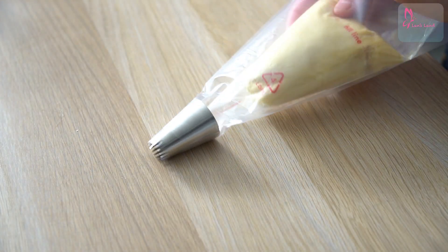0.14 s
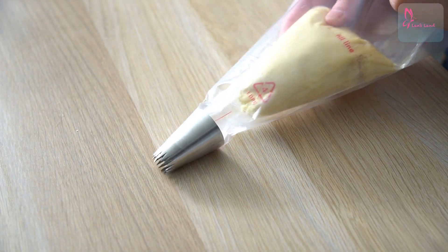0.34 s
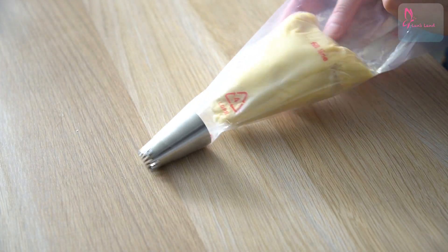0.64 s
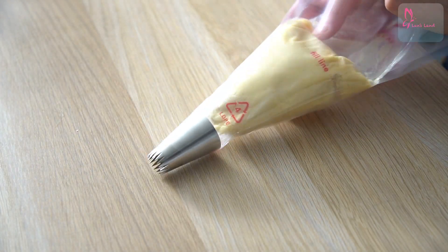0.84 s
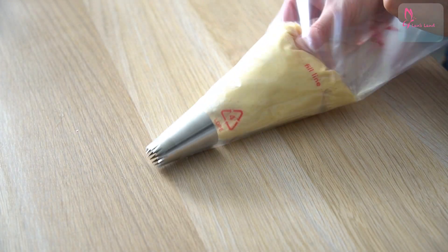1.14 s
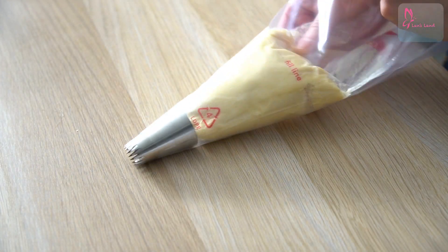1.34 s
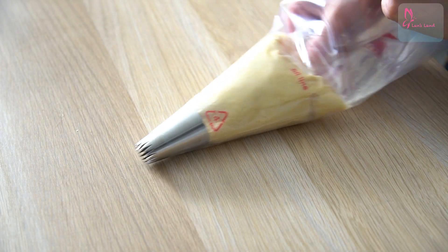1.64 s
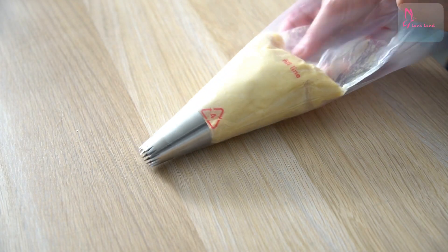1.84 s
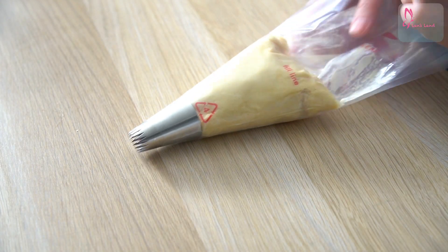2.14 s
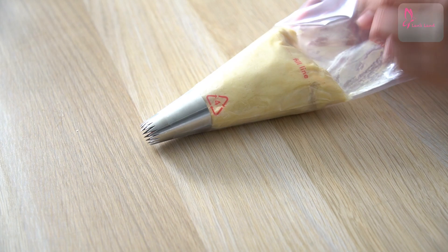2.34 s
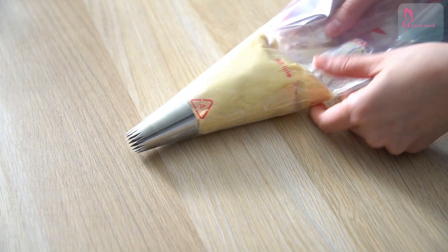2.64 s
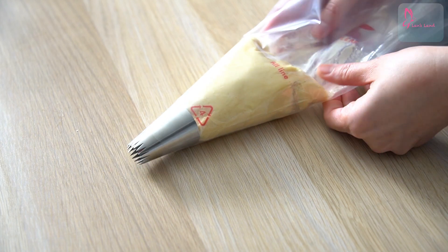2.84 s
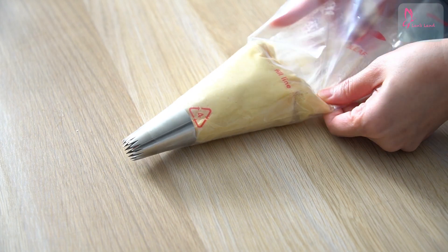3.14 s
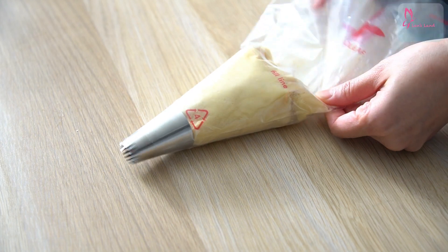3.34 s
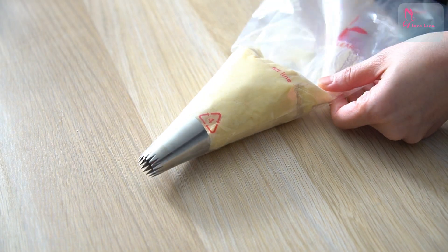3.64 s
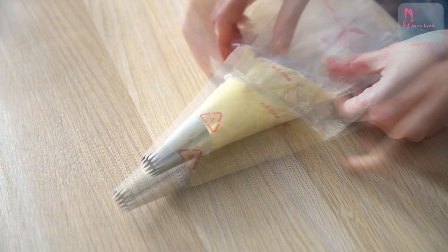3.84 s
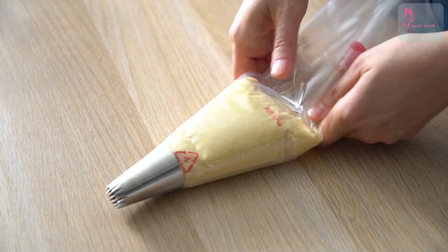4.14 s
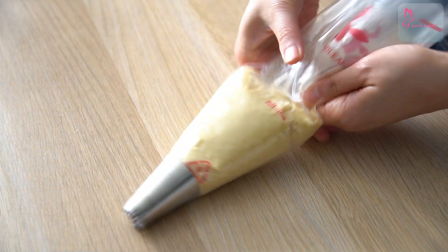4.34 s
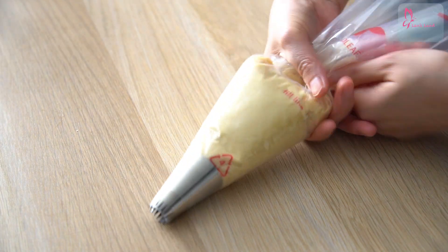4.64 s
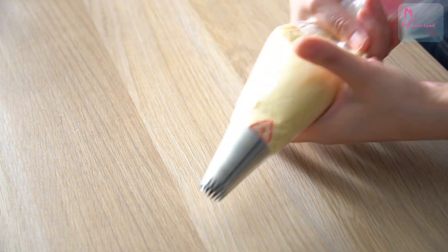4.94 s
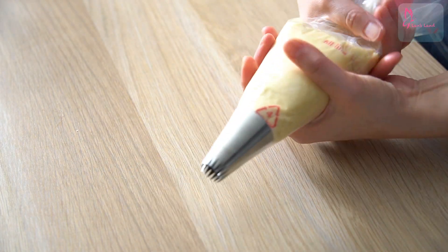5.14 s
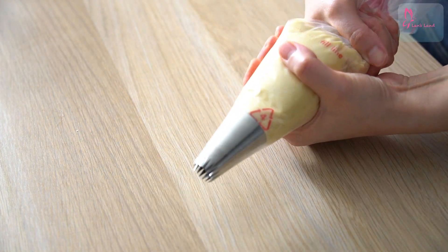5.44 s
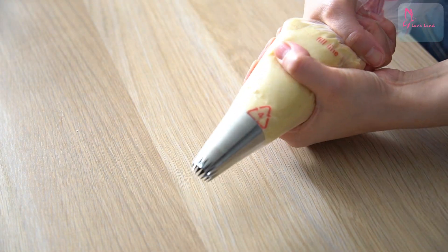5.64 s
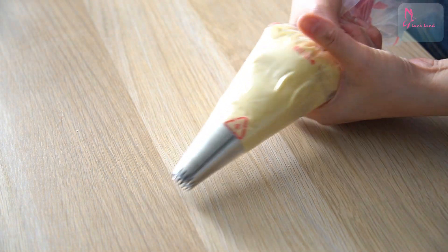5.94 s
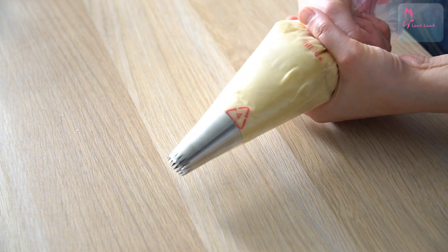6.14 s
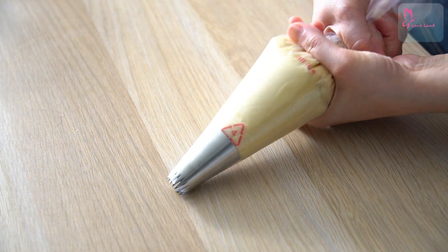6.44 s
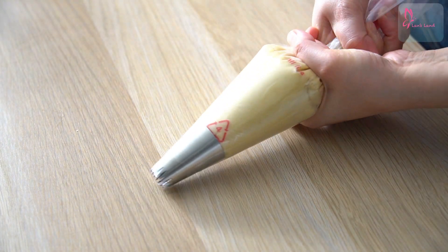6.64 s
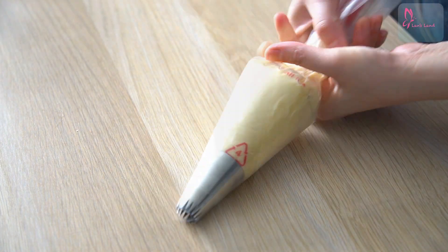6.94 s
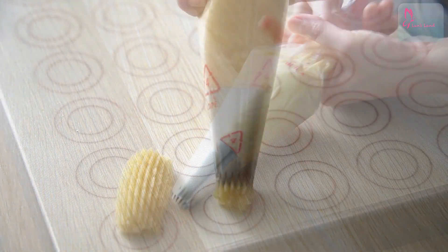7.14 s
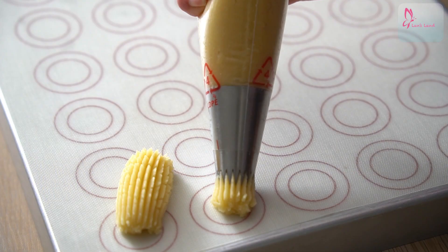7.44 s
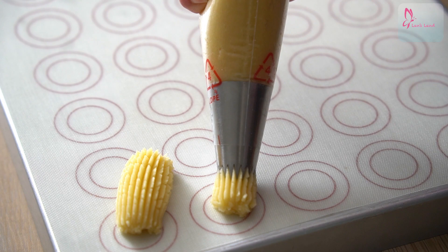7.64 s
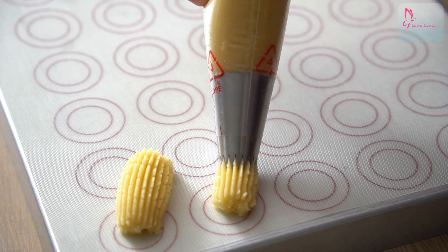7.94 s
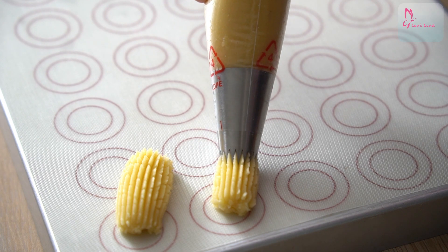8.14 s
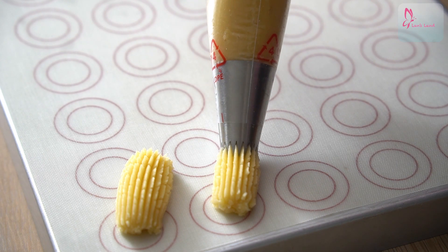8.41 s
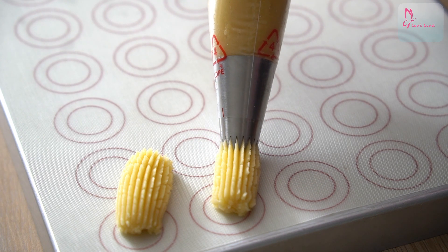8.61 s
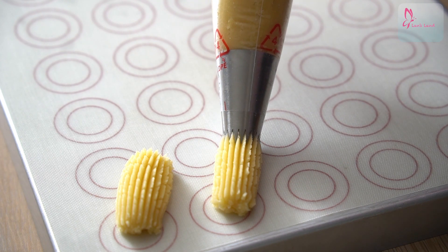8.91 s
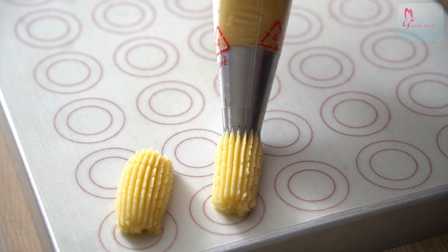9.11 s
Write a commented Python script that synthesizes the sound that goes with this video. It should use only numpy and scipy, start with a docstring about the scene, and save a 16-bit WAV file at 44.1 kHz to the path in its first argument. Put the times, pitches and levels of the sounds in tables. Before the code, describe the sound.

Hands squeeze a thin plastic piping bag on a wooden kitchen table, crinkling and snapping sharply, then a sudden cut to near silence with faint ticks.

```python
"""First, hands squeeze a thin plastic piping bag on a wooden table in a hard-walled kitchen, close to stereo
microphones: flipping creases ring and crack over fine crackle, the nozzle excites wood and steel modes, and
echoes with a dense tail answer. Shaped noise (room air) and wavering sines (appliance hum) lie beneath.
At 7.4 s a fade of under 3 ms leads to a quieter scene: softer air, the hum and three faint film ticks."""
import sys
import numpy as np
from scipy import signal
from scipy.io import wavfile
from scipy.ndimage import uniform_filter1d

SR = 44100
rng = np.random.default_rng(int(sys.argv[2]) if len(sys.argv) > 2 else 0)


def int16_out(signal):
    """Quantize to a 16-bit WAV file."""
    q = np.round(np.clip(np.atleast_2d(signal).T, -1, 1) * 32767)
    wavfile.write(sys.argv[1], SR, q.astype(np.int16))


N = 408807
EDIT_S = 7.405  # start of the quieter scene


def amp(db):
    """Decibels to gain."""
    return 10 ** (np.asarray(db) / 20)


def evened(x):
    """Scales to rms 1."""
    return x / np.sqrt(np.mean(x ** 2) + 1e-20)


def read(points, hz):
    """Interpolates a table on a log-frequency axis."""
    point_hz, value = np.transpose(points)
    return np.interp(np.log(hz + 1), np.log(point_hz + 1), value)


def add(mix, start_s, sound):
    """Adds a sound to both channels at a time."""
    part = mix[:, max(round(start_s * SR), 0):][:, :sound.shape[-1]]
    part += sound[..., :part.shape[-1]]


def panned(left_db):
    """Channel gains that set left over right by left_db."""
    return amp([[left_db / 2], [-left_db / 2]])


def slow(top_hz):
    """Random drift of rms 1: 20 sines over the three octaves below top_hz."""
    t = np.arange(0, N + 256, 256) / SR
    rates_hz = np.geomspace(top_hz / 8, top_hz, 20)
    drift = sum(np.sin(2 * np.pi * (hz * t + rng.random())) for hz in rates_hz)
    return np.interp(np.arange(N) / SR, t, evened(drift))


# spectrum of room air and microphone hiss: (freq_hz, density_db)
AIR_COLOUR = [(130, -23.5), (300, -13), (450, -12), (640, -12), (1000, -14), (2800, -20), (3600, -27.5),
              (10000, -31.5), (15700, -35.5)]
# tilt of the air in the first scene: (freq_hz, gain_db)
FIRST_AIR_TILT = [(200, 0.5), (600, -2), (2500, 4.5), (6000, 6), (14000, 5.5)]
# left-right likeness of the air, first scene: (freq_hz, likeness_ratio)
FIRST_AIR_LIKENESS = [(60, 0.98), (380, 0.98), (2380, 0.14), (15000, 0.4)]
# left-right likeness of the air, second scene: (freq_hz, likeness_ratio)
SECOND_AIR_LIKENESS = [(60, 0.35), (240, 0.28), (950, 0.072), (3770, 0.03), (15000, 0.07)]
FIRST_AIR_DB, SECOND_AIR_DB = -47.5, -55.5


def air():
    """Random short-time spectra with soft patches; the first scene louder and tilted, the second throbbing."""
    frames, hz = N // 256 + 5, np.fft.rfftfreq(1024, 1 / SR)
    a, b, c, d, patches = rng.standard_normal((frames, 513, 5)).T
    left, other = a + 1j * b, c + 1j * d
    soft = uniform_filter1d(uniform_filter1d(patches, 12, 0), 14, 1)
    colour_db = read(AIR_COLOUR, hz)[:, None] + 1.54 * evened(soft)
    first_tilt_db = read(FIRST_AIR_TILT, hz)[:, None]
    airs = []
    for likeness, tilt_db in ((FIRST_AIR_LIKENESS, first_tilt_db), (SECOND_AIR_LIKENESS, 0)):
        same = np.clip(read(likeness, hz), -1, 1)[:, None]
        right = same * left + np.sqrt(1 - same ** 2) * other
        spectra = np.array([left, right]) * amp(colour_db + tilt_db)
        airs.append(evened(signal.istft(spectra, nperseg=1024, noverlap=768)[1][:, :N]))
    return amp(FIRST_AIR_DB) * airs[0], amp(SECOND_AIR_DB + 1.0 * slow(22)) * airs[1]


# appliance lines: (freq_hz, level_db)
HUM_LINES = [(442, -69.5), (543, -62.5), (1708, -75.5)]


def hum():
    """Two motor lines and a faint whine: sines wavering in level and phase."""
    t, out = np.arange(N) / SR, 0
    for hz, level_db in HUM_LINES:
        level = np.sqrt(2) * amp(level_db + 1.8 * slow(6.7))
        out = out + level * np.sin(2 * np.pi * (hz * t + 0.15 * slow(6.6)))
    return out


# decay of the room tail: (freq_hz, t60_s)
ROOM_DECAY = [(300, 0.32), (800, 0.38), (2500, 0.42), (6000, 0.28), (14000, 0.25)]
# strength of the tail: (freq_hz, gain_db)
ROOM_LEVEL = [(700, -5.5), (2500, -6.5), (9000, -2)]
# left-right likeness of the tail: (freq_hz, likeness_ratio)
ROOM_LIKENESS = [(300, 1), (1000, 0.92), (3000, 0.6), (9000, 0.44)]
# single echoes: (delay_s, left_db, right_db)
ECHOES = [(.006, -15.5, -10.5), (0.0155, -17, -18)]


def kitchen(x):
    """Single echoes and a dense tail of sparse taps in which each band dies at its own speed."""
    taps = np.zeros((2, 20000))
    at = np.arange(440, 19980, 20) + rng.integers(0, 20, (2, 977))
    np.put_along_axis(taps, at, rng.choice([-1., 1.], at.shape), 1)
    hz, t, (a, b) = signal.stft(taps, SR, nperseg=256)
    same = np.clip(read(ROOM_LIKENESS, hz), 0, 1)[:, None]
    right = same * a + np.sqrt(1 - same ** 2) * b
    decaying = np.array([a, right]) * amp(-60 * t / read(ROOM_DECAY, hz)[:, None])
    coloured = decaying * amp(read(ROOM_LEVEL, hz))[:, None]
    even, tail = (signal.istft(part, SR, nperseg=256)[1] for part in (decaying, coloured))
    tail /= np.linalg.norm(even[0])  # scaled by the uncoloured tail
    for delay_s, *level_db in ECHOES:
        tail[:, round(delay_s * SR)] += amp(level_db)
    return signal.fftconvolve(x.mean(0)[None], tail, axes=1)[:, :N]


def flick(hz, cycles, phase, apart):
    """A film patch flips: a few cycles swell and die, reaching the two channels 2 * apart samples apart."""
    turns = np.maximum(np.arange(-8, 440) - apart * np.array([[1], [-1]]), 0) * hz / SR
    burst = turns * np.exp(-turns / cycles) * np.sin(2 * np.pi * (turns + phase))
    burst = np.diff(burst, prepend=0)  # a small sheet radiates no bass
    return burst / abs(burst).max()


# faint ticks of the stretched bag: (start_s, level_db)
TICKS = [(7.5331, -57), (7.6633, -56), (8.6989, -59)]


def ticks():
    """The stretched bag ticks faintly: a flick convolved with a short airy noise tail."""
    out, t = np.zeros((2, N)), np.arange(3000) / SR
    for start_s, level_db in TICKS:
        tail = rng.standard_normal((2, 3000)) * amp(-10.0 - 60 * t / 0.28)
        add(out, start_s, amp(level_db) * signal.fftconvolve(flick(9600, 0.5, 0, 1), tail, axes=1))
    return out


# nozzle and bag on the table: (start_s, level_db, steel_db, lowest_wood_db, middle_steel_db)
KNOCKS = [(.533, -23.5, -11, -0.5, -9), (.546, -32, -1.5, -11, -8), (.832, -26, -18, 1.5, -2),
          (.976, -18.5, -11.5, 0, -1), (.983, -29.5, -7, -2, 3), (2.596, -34, -45, -2.5, 4),
          (4.443, -24.5, -12.5, 1, -3), (7.107, -18, -50, -6.5, -3)]
# table top modes: (freq_hz, level_db, t60_s)
WOOD_MODES = [(670, 1.5, 0.049), (752.5, 8.5, 0.023), (881, -1, 0.032), (1148, -9.5, 0.043),
              (1590, -4, 0.017)]
# nozzle modes: (freq_hz, level_db, t60_s)
STEEL_MODES = [(1760, 3, 0.09), (1930, 3, 0.07), (2700, -1, 0.03), (4500, -5, 0.06), (5500, -4, 0.06),
               (7160, -2, 0.09), (9170, -4, 0.06), (12850, -4, 0.065)]


def ringing(modes, t):
    """Decaying sines, one per mode."""
    return [amp(db - 60 * t / t60_s) * np.sin(2 * np.pi * hz * t) for hz, db, t60_s in modes]


def knocks():
    """Each blow rings wood and steel modes, weighted by where it lands; the steel chatters briefly."""
    out, t = np.zeros((2, N)), np.arange(SR // 4) / SR
    wood, steel = ringing(WOOD_MODES, t), ringing(STEEL_MODES, t)
    middle = np.array([2500 < hz < 10000 for hz, *_ in STEEL_MODES])
    give = 1 - np.exp(-(t / 0.0026) ** 2)  # the wood takes a moment to give way
    for start_s, level_db, steel_db, lowest_wood_db, middle_steel_db in KNOCKS:
        chatter = rng.standard_normal(1500) * amp(-21.5 - 60 * t[:1500] / 0.069)
        chatter[0] = 1  # the blow itself
        table = give * (amp(lowest_wood_db) * wood[0] + sum(wood[1:]))
        spot_db = 2 * rng.standard_normal(len(STEEL_MODES))
        modes = amp(spot_db + middle_steel_db * middle) @ steel
        cone = signal.fftconvolve(modes, chatter) + amp(-1.0) * np.pad(chatter, (0, len(t) - 1))
        blow = table + amp(steel_db) * cone[:len(t)]
        add(out, start_s, amp(level_db) * panned(1.5) * blow)
    return out


# squeezes of the hands: (start_s, length_s, crackle_db, treble_db)
SQUEEZES = [(0.0, .1, -45.5, -9.5), (0.105, 0.086, -38.5, -17), (0.362, 0.34, -45, -5),
            (0.817, 0.37, -38.5, -5), (1.328, 0.58, -36.5, -9), (1.758, 0.14, -34, -19),
            (2.024, 0.23, -39, -4.5), (2.3, 0.023, -37, -25), (2.577, 0.23, -51.5, -11),
            (2.935, 0.027, -36.5, -7.5), (3.136, 0.29, -34, -6.5), (3.531, 0.044, -37.5, -3),
            (3.866, 0.21, -32, -10), (4.175, 0.18, -35.5, -4.5), (4.408, 0.35, -37, -3.5),
            (4.92, 0.14, -40, -4), (5.319, 0.27, -41.5, -4), (6.355, 0.19, -51, 2.5),
            (6.567, 0.055, -39, -17), (6.734, 0.12, -43, -0.5), (6.954, 0.091, -42, -5.5),
            (7.242, 0.19, -46, -4.5)]
GRIP_DB_PER_S, SAG_DB_PER_S, LET_GO_DB_PER_S, REST_DB = 287, 4, 186, -65.5


def effort():
    """Each squeeze grips fast, sags while held and lets go; the strongest sets crackle level and treble."""
    start_s, length_s, peak_db, treble_db = np.transpose(SQUEEZES)[:, :, None]
    since_s = np.arange(0, N + 256, 256) / SR - start_s
    held_db = peak_db + np.minimum(since_s * GRIP_DB_PER_S, -since_s * SAG_DB_PER_S)
    shape_db = held_db - LET_GO_DB_PER_S * np.maximum(since_s - length_s, 0)
    level_db = np.maximum(shape_db.max(0), REST_DB)
    treble_db = uniform_filter1d(treble_db[shape_db.argmax(0), 0], size=7)
    return [np.interp(np.arange(N) / 256, np.arange(len(c)), c) for c in (level_db, treble_db)]


# colour of the crackle: (freq_hz, gain_db)
FILM_COLOUR = [(150, -46), (309, -5), (981, -2), (1910, 2.5), (2860, -1), (6870, -6.5), (9750, -12),
               (15100, -47)]


def crackle():
    """Thousands of small creases of all sizes, in clumps, coloured by the film."""
    level_db, treble_db = effort()
    t = np.arange(N) / SR
    at = np.flatnonzero(rng.random(N) < 480 / SR * amp(6.0 * slow(35)))  # clumped onsets
    sizes = amp(2.85 * np.minimum(rng.exponential(1, N), 4)) * rng.choice([-1, 1], N)
    patch = rng.integers(0, 40, N)
    low, high = np.zeros((2, 2, N))
    for k, hz in enumerate(np.geomspace(400, 12000, num=40)):
        rattle = rng.standard_normal((1, 150)) * amp(-23.5 - 60 * t[:150] / 0.037)
        rattle[:, 0] = 1
        flip = flick(hz, rng.uniform(0.14, 1.1), rng.random(), rng.normal(0, 0.55))
        grain = signal.fftconvolve(flip, rattle)
        grain *= np.sqrt(hz) * amp(read(FILM_COLOUR, hz)) * panned(rng.normal(0, 5.8)) / np.linalg.norm(grain)
        for start in at[patch[at] == k]:
            add(high if hz > 6500 else low, start / SR, sizes[start] * grain)
    level = amp(level_db) * (t < EDIT_S)
    return level * (evened(low[:, :N]) + amp(treble_db) * evened(high[:, :N]))


LESSER_COUNT, LESSER_OVER_DB, LESSER_SPREAD_DB = 190, 10, -0.5
LESSER_HZ, LESSER_OCTAVES, LESSER_TREBLE_DB = 3110, 0.65, -16.5


def lesser_snaps():
    """Lesser creases flip at random times, as strong as the squeeze of the moment; rows as in SNAPS."""
    start_s = rng.uniform(0, EDIT_S, LESSER_COUNT)
    size, pitch, sheen = rng.standard_normal((3, LESSER_COUNT))
    squeeze_db = effort()[0][(start_s * SR).astype(int)]
    level_db = squeeze_db + LESSER_OVER_DB + LESSER_SPREAD_DB * size
    pitch_hz = np.clip(LESSER_HZ * 2 ** (LESSER_OCTAVES * pitch), 900, 9500)
    return list(zip(start_s, level_db, pitch_hz, level_db + LESSER_TREBLE_DB + 5.2 * sheen))


# single creases that flip: (start_s, level_db, pitch_hz, treble_db)
SNAPS = [(0.1159, -20.5, 2850, -38), (0.1535, -15.5, 3230, -27), (0.1685, -12, 3040, -22),
         (0.4363, -18, 2460, -24.5), (0.5247, -13, 2920, -26.5), (0.5303, -19, 1860, -28.5),
         (0.612, -14.5, 3530, -27.5), (0.6847, -20.5, 2040, -36.5), (0.7236, -19, 4900, -39),
         (0.8251, -18.5, 1850, -33.5), (0.8325, -19.5, 2510, -26), (0.9514, -24, 2620, -42),
         (0.9668, -16, 1920, -31), (0.9752, -14, 930, -20.5), (1.0752, -22, 1600, -32),
         (1.0912, -19, 3200, -39), (1.1132, -24, 1460, -37), (1.3319, -21, 1470, -52),
         (1.3822, -25, 1760, -37), (1.4297, -18.5, 1480, -22.5), (1.4982, -18, 1510, -33),
         (1.6544, -12, 4690, -31), (1.6911, -10.5, 3820, -21.5), (1.738, -15, 5470, -31),
         (1.7685, -20.5, 2610, -46), (1.8139, -8.5, 2730, -27), (1.8484, -14, 2470, -37),
         (1.855, -11.5, 1460, -28.5), (1.925, -17, 1550, -32), (2.0767, -8.5, 2960, -23.5),
         (2.203, -18, 3200, -34), (2.3083, -6.5, 4960, -32), (2.3326, -18.5, 1770, -27.5),
         (2.4498, -20.5, 1720, -37.5), (2.6302, -26, 1180, -56), (2.7303, -21, 1070, -22.5),
         (2.9253, -19, 2650, -46), (2.9803, -17, 3400, -44), (3.1331, -14.5, 3030, -22),
         (3.2076, -23, 3260, -38), (3.2776, -17, 2000, -26.5), (3.3481, -15.5, 1990, -31),
         (3.366, -16.5, 2300, -27.5), (3.3902, -13, 2920, -28.5), (3.4007, -18, 1960, -25.5),
         (3.5316, -18, 4200, -27), (3.8276, -15.5, 3340, -36), (3.8596, -19, 2870, -46),
         (3.888, -14.5, 2510, -32), (3.9062, -10, 2800, -27), (3.9315, -20, 2450, -31),
         (3.9987, -17, 3200, -27), (4.0115, -15, 5030, -19.5), (4.043, -12.5, 3030, -29),
         (4.0662, -19.5, 3100, -27.5), (4.1395, -18.5, 8490, -32), (4.1464, -23, 2240, -30),
         (4.1716, -26.5, 969, -28.5), (4.225, -25, 2180, -39), (4.2528, -13.5, 3550, -31),
         (4.357, -16, 3230, -30), (4.4013, -19, 2390, -26), (4.435, -9, 1920, -15.5),
         (4.5287, -14.5, 2700, -27), (4.6032, -20.5, 2910, -37), (4.6604, -18, 3120, -45),
         (4.6725, -13.5, 4720, -33), (4.6962, -12, 3200, -24), (4.7381, -16, 6100, -28),
         (4.7755, -22.5, 2450, -44), (4.8427, -17, 3380, -30), (4.8837, -10.5, 2900, -19),
         (4.9209, -18, 2310, -26.5), (4.936, -13.5, 7860, -27), (5.1666, -21.5, 2920, -48),
         (5.3183, -23, 5480, -37), (5.3702, -18, 2430, -33.5), (5.4488, -23, 3030, -29),
         (5.4797, -14.5, 4520, -32), (5.4921, -19, 2400, -32), (5.7272, -24.5, 8200, -38),
         (5.8202, -28, 8800, -34.5), (6.172, -16, 7470, -28), (6.3106, -25.5, 2520, -40),
         (6.3639, -21.5, 2680, -26.5), (6.4543, -14.5, 2260, -20.5), (6.4892, -29.5, 1100, -31.5),
         (6.635, -20, 8500, -24.5), (6.7195, -22.5, 2500, -35), (6.779, -20.5, 2700, -34),
         (6.8239, -18.5, 3570, -43), (6.938, -21.5, 5750, -30), (7.0274, -17.5, 5380, -38),
         (7.1931, -24, 3200, -35.5), (7.3106, -12.5, 3100, -36)]
RING_S, CRACK_T60_S = 0.00026, 0.004  # swell time of the patch, decay of the crack


def snaps():
    """Each crease: a patch ring, a duller neighbour and a wide crack, the last two with quick after-flips."""
    out, t = np.zeros((2, N)), np.arange(800) / SR
    for start_s, level_db, hz, treble_db in list(SNAPS) + lesser_snaps():
        u, (left_db, apart) = rng.random(4), rng.standard_normal(2)
        rattle = rng.standard_normal((1, 800)) * amp(-14.0 - 60 * t / 0.083)
        rattle *= rng.random(rattle.shape) < 1200 / SR  # separate after-flips
        rattle[:, 0] = 1
        ring = flick(hz, np.clip(RING_S * hz, .5, 1.8), u[0], 0.52 * apart)
        neighbour = flick(max(hz * (0.45 + 0.41 * u[1]), 900), 0.34, u[2], 1.3 * apart)
        body = np.pad(ring, ((0, 0), (0, len(t) - 1))) + amp(-4.0) * signal.fftconvolve(neighbour, rattle)
        sharp = flick(9000 + 1500 * u[3], 0.8, u[2], 0.5 * apart)
        wide = amp(7.5) * flick(np.sqrt(hz * 9000), 0.22, u[1], 0.69 * apart)
        spread = rng.standard_normal((1, 300)) * amp(-60 * t[:300] / CRACK_T60_S)
        crack = signal.fftconvolve(signal.fftconvolve(sharp + wide, spread), rattle)
        crack /= np.sqrt((crack[0] ** 2).sum() / (0.005 * SR))  # left energy as rms over 5 ms
        add(out, start_s + .0002, panned(left_db) * amp(level_db) * body / abs(body).max())
        add(out, start_s + .0003, panned(left_db) * amp(treble_db) * crack)
    return out


def scene():
    """The squeezed bag in its room, then the quieter scene, joined by a short fade."""
    bag, t = crackle() + snaps() + knocks(), np.arange(N) / SR
    turn = 2 * np.pi * 1.7 * t  # two random tails blend in a steady rotation, so the echo colour keeps changing
    room = kitchen(bag * np.cos(turn)) + kitchen(bag * np.sin(turn))
    first_air, second_air = (panned(1.2) * part for part in air())
    first = bag + room + first_air + amp(1.0) * hum()
    second = ticks() + second_air + hum()
    after_edit = np.clip((t - EDIT_S) / 0.0027, 0, 1)
    return first * (1 - after_edit) + second * after_edit


EDGE_HZ = 15800


def record(dry):
    """The microphone drops the bass and leans right; a low-pass then limits the band."""
    bass_cut = signal.butter(3, 210, "highpass", fs=SR, output="sos")
    thin = panned(-1.86) * signal.sosfilt(bass_cut, dry)
    band_limit = signal.firwin(511, EDGE_HZ, window=("kaiser", 9), fs=SR)
    return signal.oaconvolve(thin, band_limit[None], "same")


dry = scene()
out = record(dry)
int16_out(out)
```